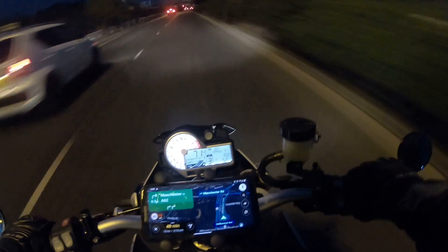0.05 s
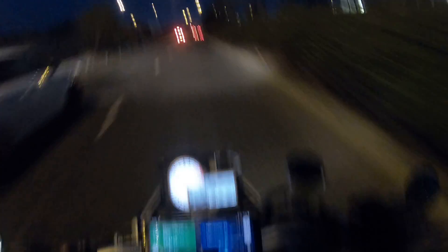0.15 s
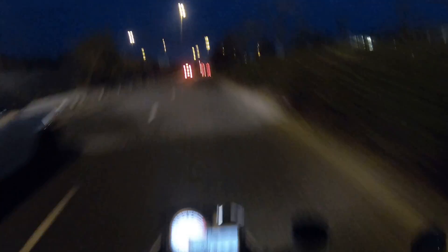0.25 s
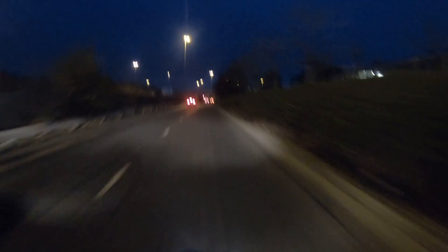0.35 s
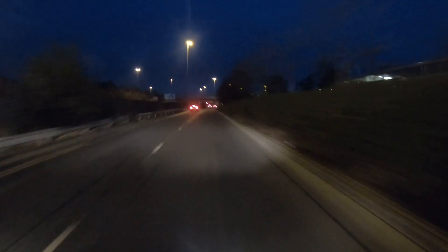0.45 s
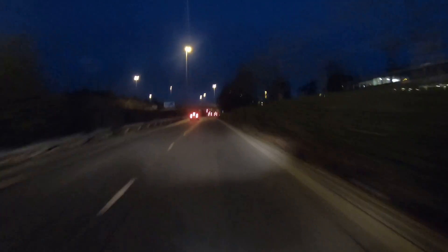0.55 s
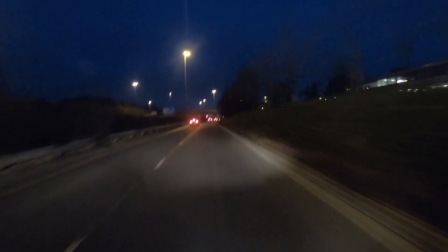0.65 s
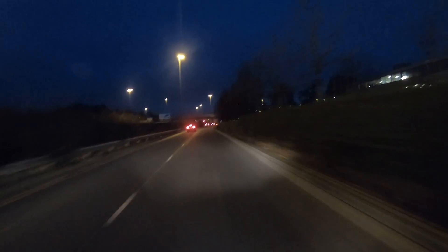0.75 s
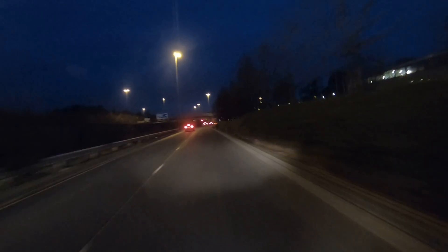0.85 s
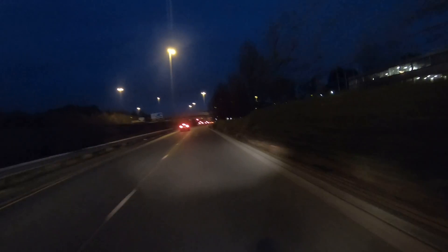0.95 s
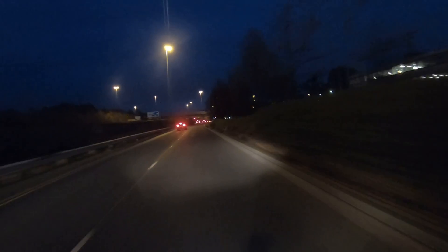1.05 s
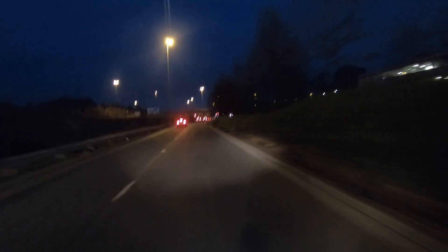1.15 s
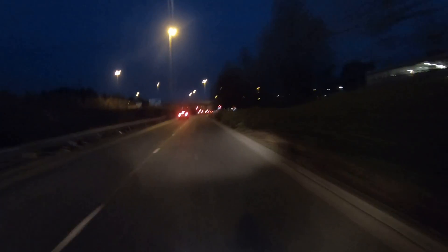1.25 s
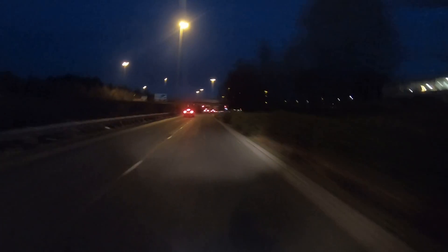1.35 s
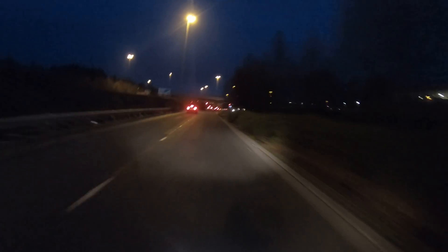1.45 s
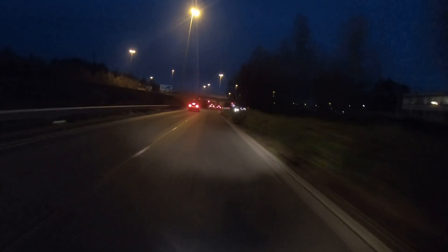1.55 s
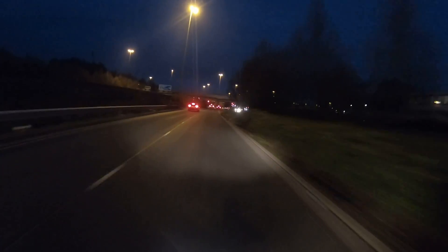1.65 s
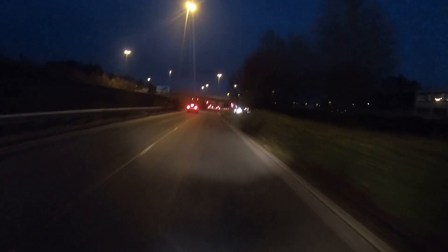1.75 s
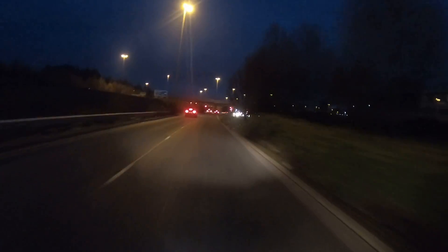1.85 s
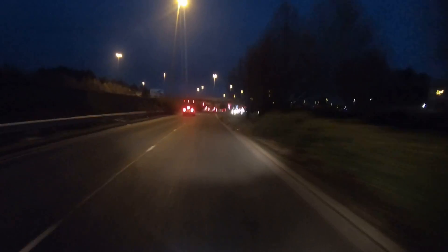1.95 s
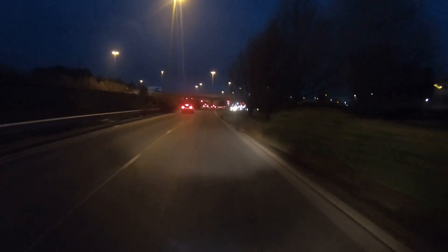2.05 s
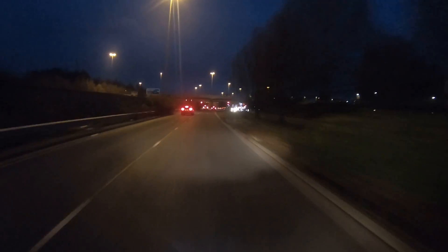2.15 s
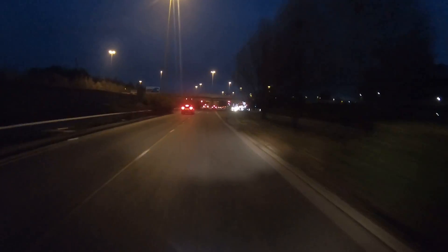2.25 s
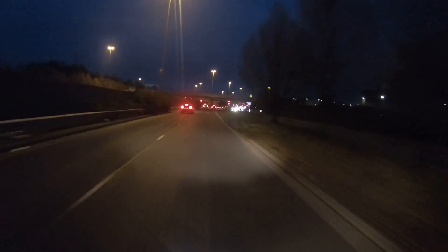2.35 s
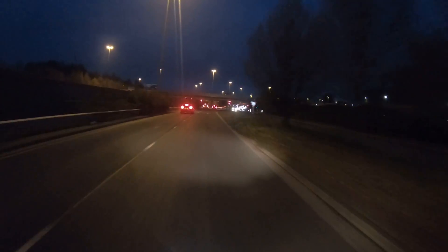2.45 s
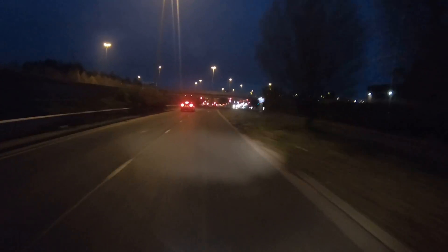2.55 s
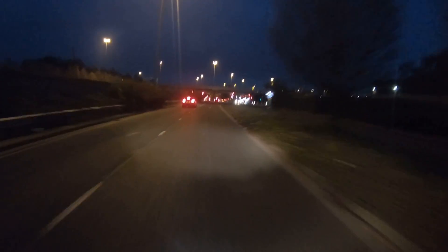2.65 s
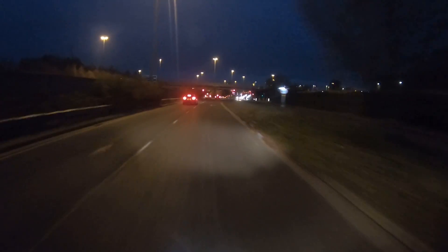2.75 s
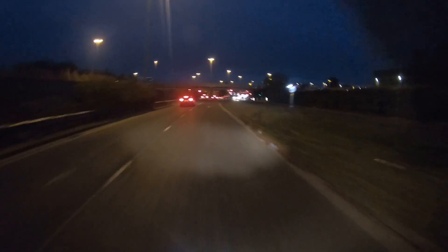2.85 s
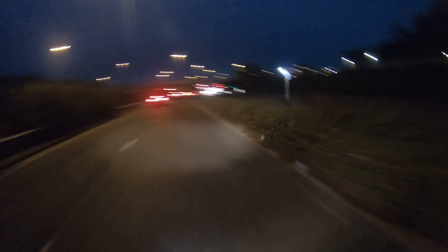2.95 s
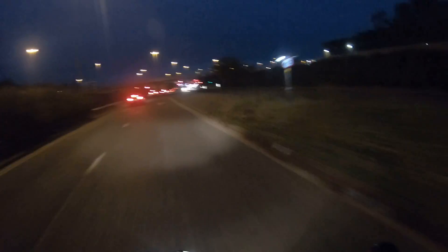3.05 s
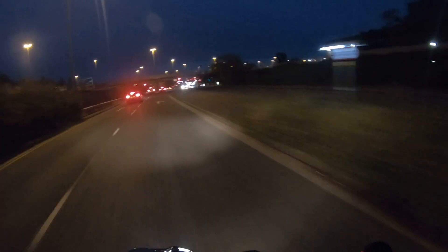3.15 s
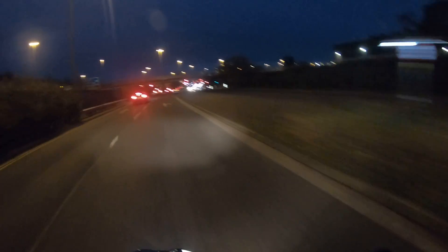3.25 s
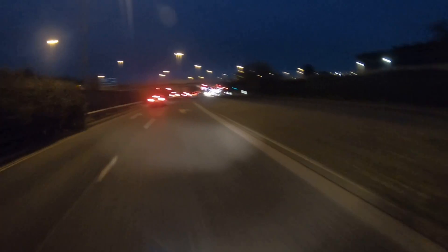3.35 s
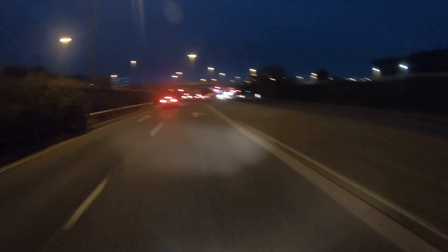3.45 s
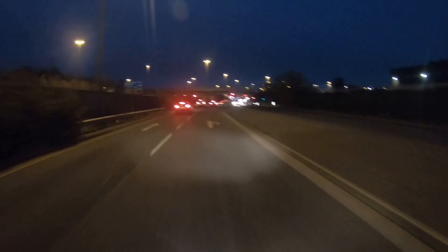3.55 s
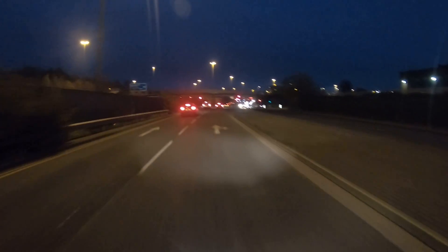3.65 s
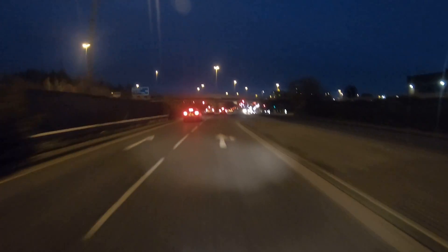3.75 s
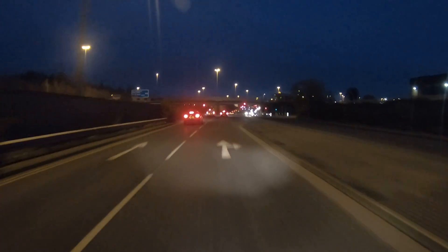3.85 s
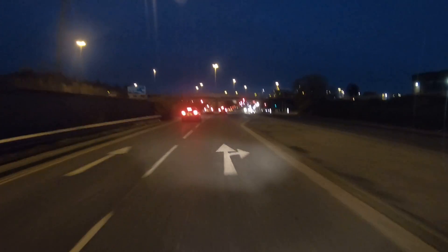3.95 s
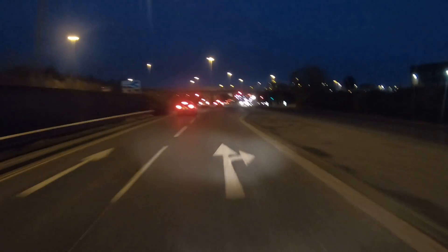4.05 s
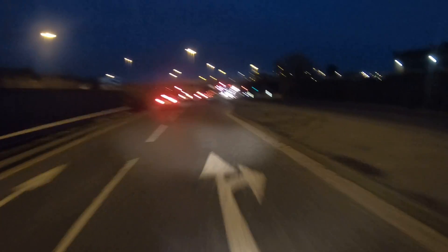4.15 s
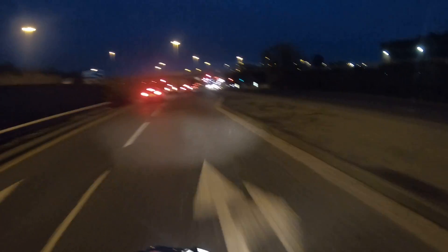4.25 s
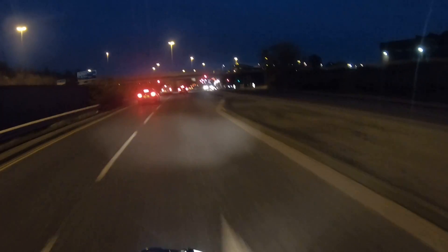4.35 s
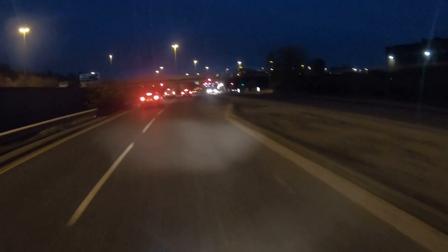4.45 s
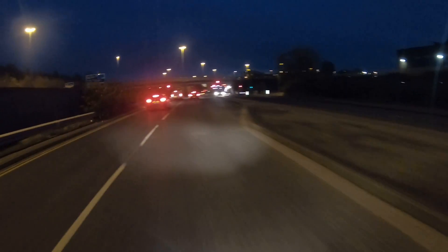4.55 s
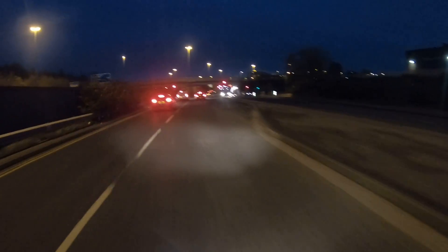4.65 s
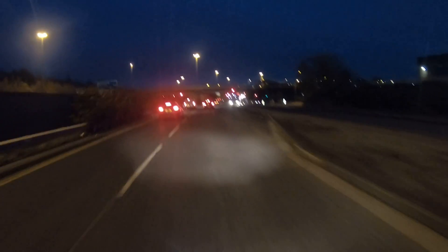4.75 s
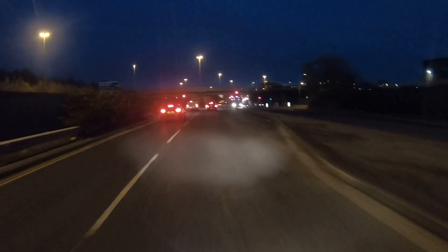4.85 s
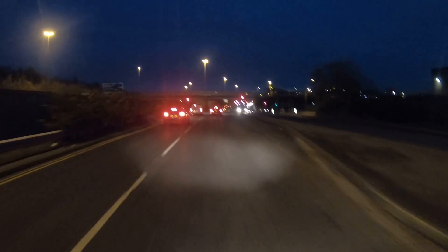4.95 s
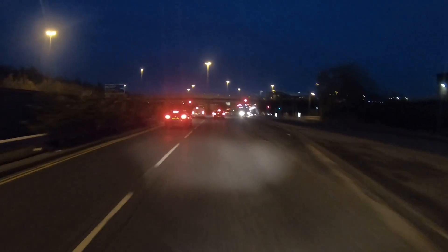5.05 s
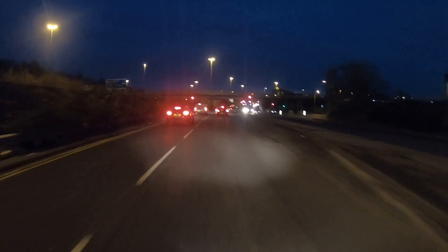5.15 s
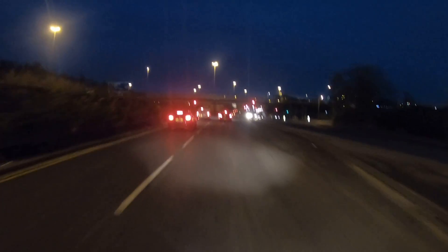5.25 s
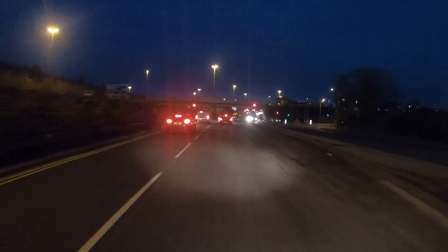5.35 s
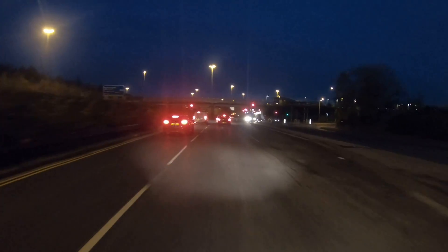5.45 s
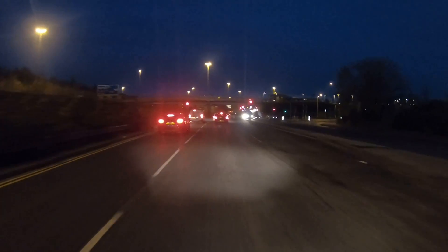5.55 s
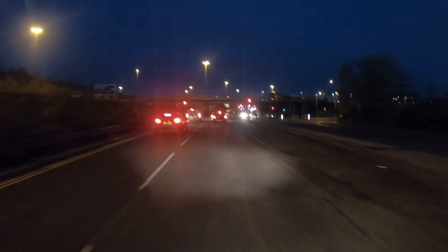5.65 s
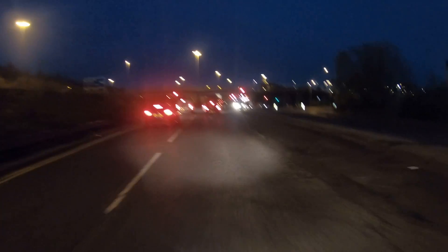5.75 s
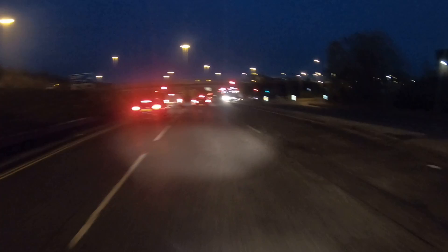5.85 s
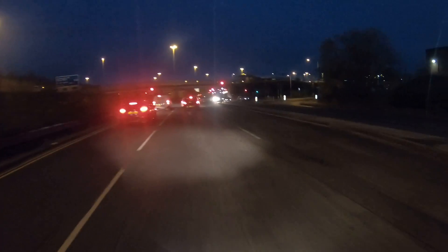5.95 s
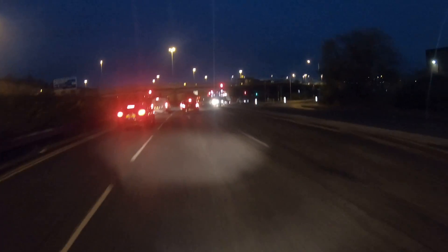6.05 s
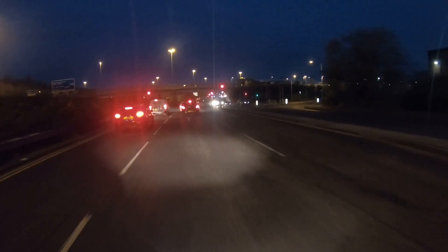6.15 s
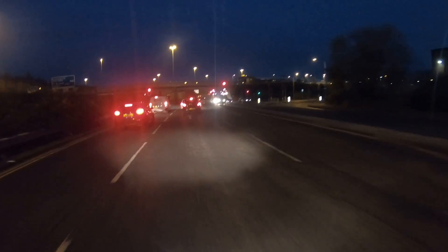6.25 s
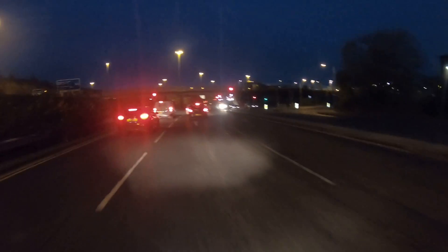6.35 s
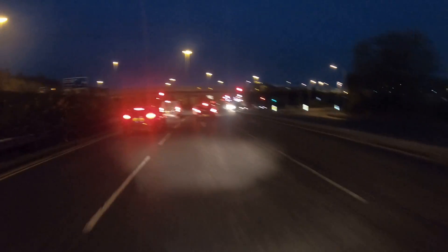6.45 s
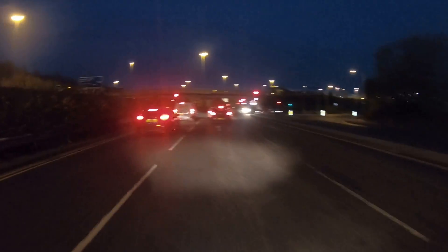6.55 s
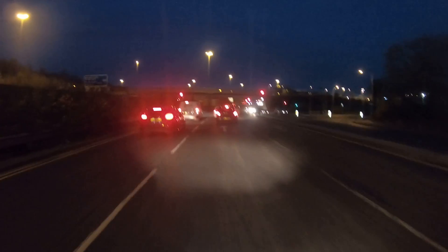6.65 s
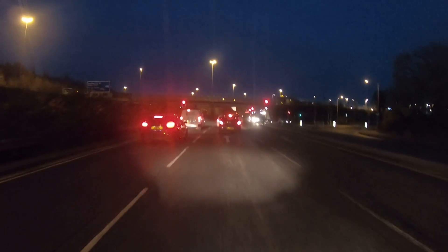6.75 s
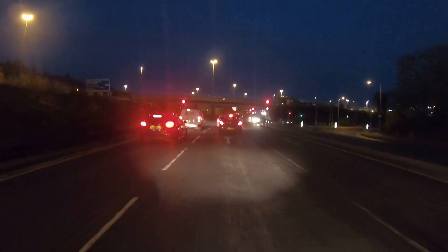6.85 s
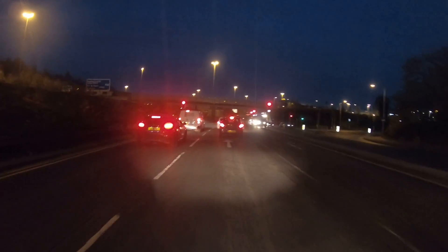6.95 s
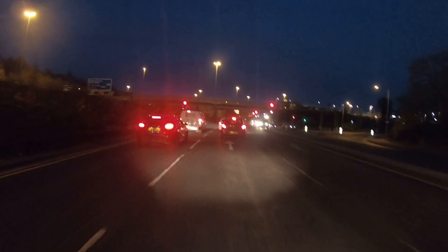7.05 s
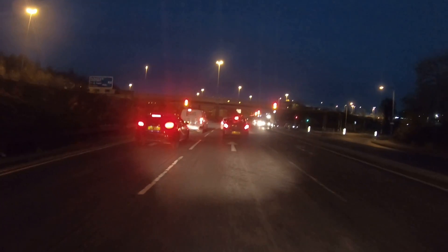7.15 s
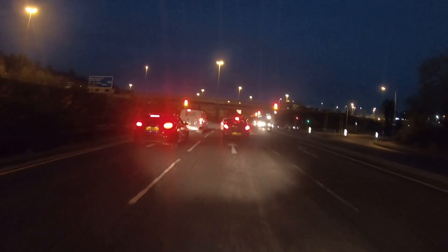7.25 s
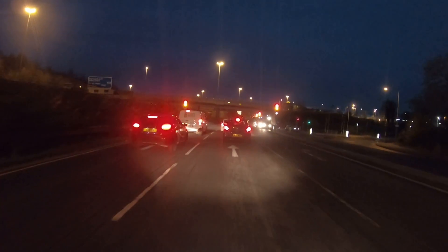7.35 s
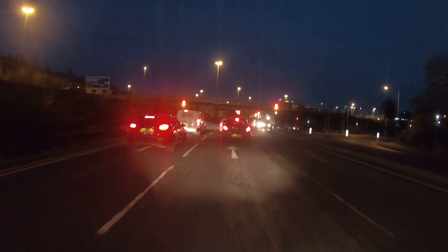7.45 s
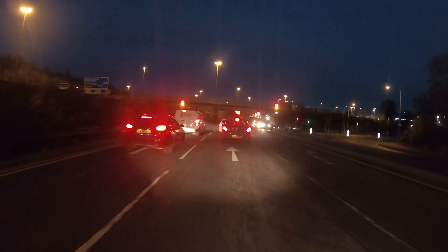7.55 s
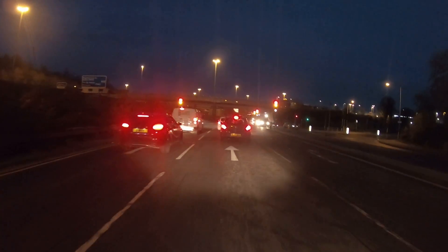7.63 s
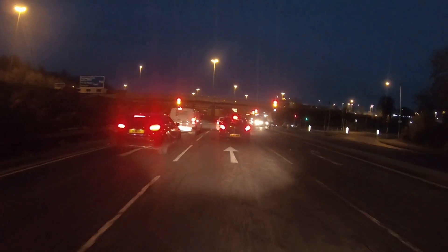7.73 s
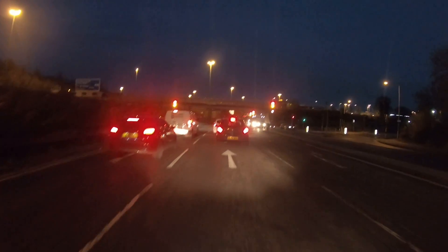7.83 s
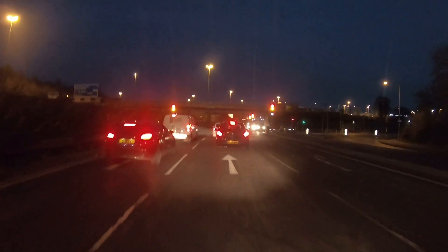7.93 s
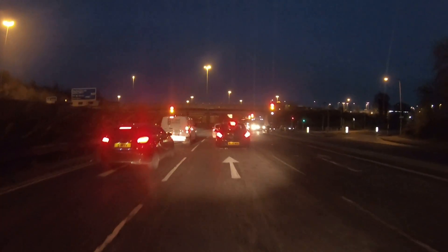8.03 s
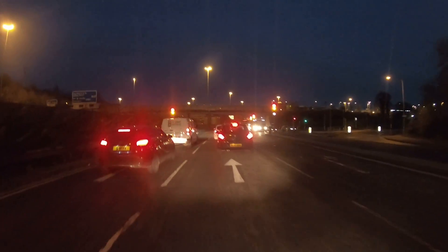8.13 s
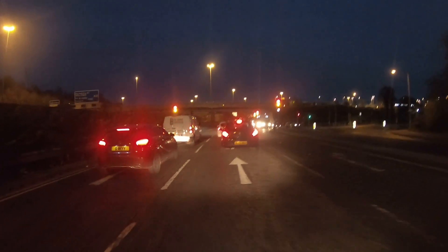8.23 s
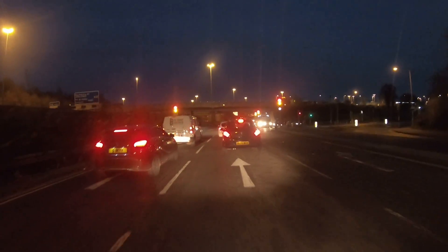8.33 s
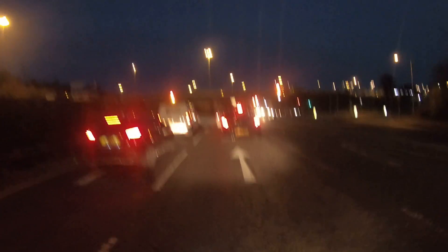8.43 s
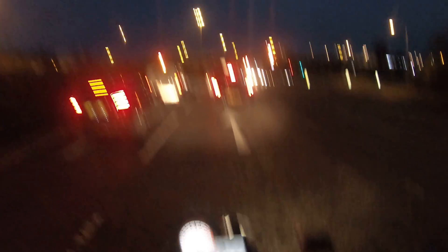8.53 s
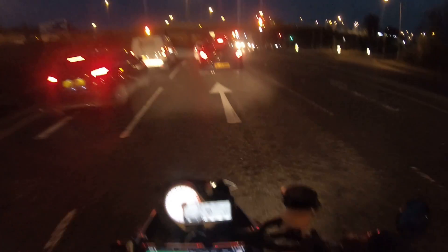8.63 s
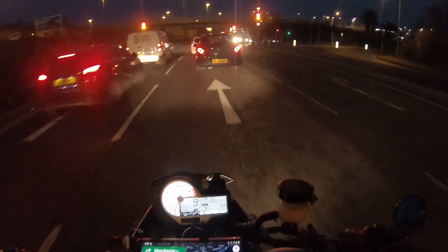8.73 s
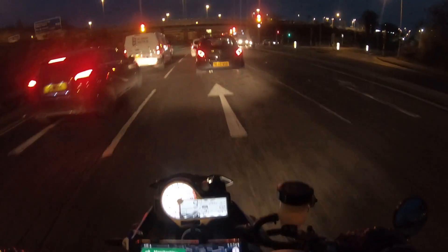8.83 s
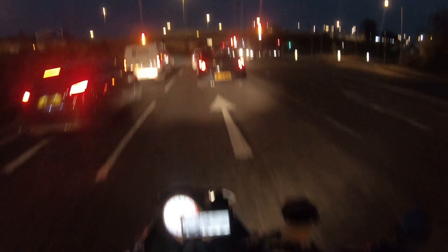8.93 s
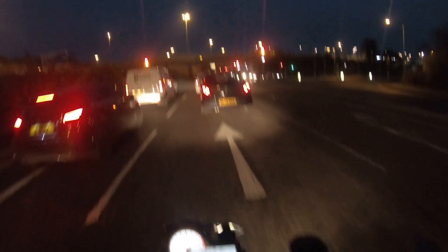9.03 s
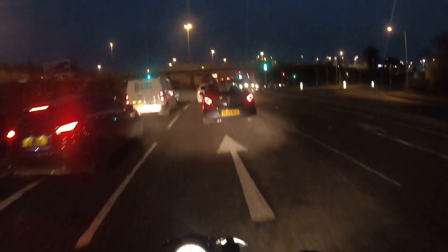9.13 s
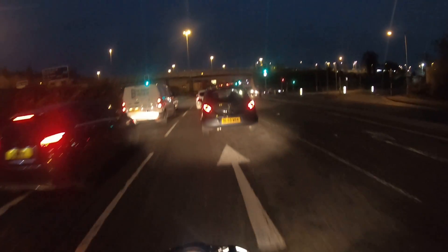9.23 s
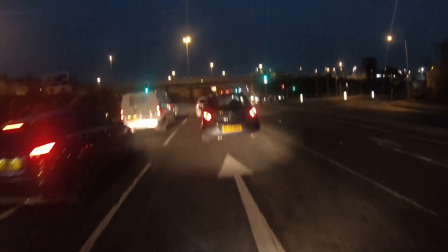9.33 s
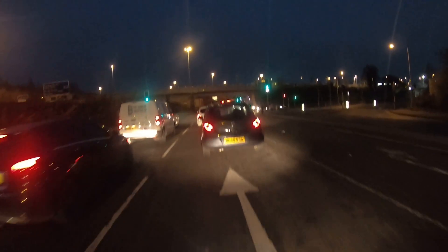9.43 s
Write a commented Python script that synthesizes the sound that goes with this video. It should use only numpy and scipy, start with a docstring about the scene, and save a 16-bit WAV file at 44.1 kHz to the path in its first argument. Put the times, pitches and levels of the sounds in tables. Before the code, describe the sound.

Heard from a motorcycle rider's helmet on an open road. At 0 s a deep, hard gust thumps over steady wind buffeting and a smooth, nearly pure exhaust drone of about 230 Hz, with bright valve clatter, hiss and gear whine. The throttle is shut, so everything glides gently downward. From about 2 s braking makes the fall quicker; a hollow intake burble passes around 2 to 3 s, and the discs sing faintly, a little more near 5.7 s. Wind eases, with a milder gust near 3.6 s. By 4 to 6 s the engine lugs, rough and throbbing, with quick dropouts from 5.6 to 6.1 s. At 6.2 s the clutch is pulled: the tone collapses and revs fall. Around 6.5 to 7.2 s a firmer, lumpy idle is caught, about 43 beats per second, hunting slightly with soft clatter until the end, around 9.5 s.

```python
"""A four-cylinder motorcycle coasts with the throttle shut, heard from the rider's helmet in buffeting wind.
Exhaust drone, valve clatter and gear whine, all timed by the firings, sink with the revs, faster once braking.
Brake discs sing faintly in their modes; the engine lugs, the exhaust note falters and the wind eases.
The clutch is pulled: the tone collapses, the revs drop, and the idle control catches a lumpy, hunting idle.
Tones follow the firing phase; exhaust beats are pulses in a pipe; rattle, air and pads are filtered noise."""
import sys
import numpy as np
from scipy import signal
from scipy.fft import rfft, irfft, next_fast_len
from scipy.io import wavfile
from scipy.ndimage import uniform_filter1d, map_coordinates

SR = 44100
rng = np.random.default_rng(int(sys.argv[2]) if len(sys.argv) > 2 else 0)


def materialize(psi):
    """Save the field psi as 16-bit PCM at rate SR to the path in sys.argv[1].

    A 1-D psi becomes a single channel; in a 2-D psi each row is a channel.
    """
    bounded = np.clip(np.atleast_2d(psi).T, -1, 1)
    quanta = np.round(bounded * 32767).astype(np.int16)
    wavfile.write(sys.argv[1], SR, quanta)


N = 418503


def amp(db):
    """Decibels to gain."""
    return 10 ** (np.asarray(db) / 20)


def unit(x):
    """Scale to rms 1."""
    return x / np.sqrt(np.mean(x ** 2) + 1e-20)


def clock():
    """Time of each sample in seconds."""
    return np.arange(N) / SR


def ramp(x, start, end):
    """0 at start, 1 at end, straight between and held beyond."""
    return np.clip((x - start) / (end - start), 0, 1)


def spell(s, length, order=4):
    """Flat-topped swell from 0 to 1 and back, centred on s; a higher order has steeper sides."""
    return np.exp(-np.abs(2 * (clock() - s) / length) ** order)


def wobble(rate):
    """Smooth random curve, rate knots a second."""
    knots = rng.standard_normal(int(N * rate / SR) + 4)
    return map_coordinates(knots, [np.arange(N) * rate / SR])


def filtered(x, response):
    """x times a complex response of frequency."""
    size = next_fast_len(N + SR // 2)
    return irfft(rfft(x, size) * response(np.fft.rfftfreq(size, 1 / SR)), size)[:N]


def coloured(x, points):
    """x through a (frequency [Hz], level [dB]) spectrum, at rms 1."""
    f, db = np.transpose(points)
    return unit(filtered(x, lambda hz: amp(np.interp(np.log(hz + 1), np.log(f), db))))


def resonate(x, modes):
    """x through (frequency [Hz], width [Hz], level [dB]) resonances, at rms 1."""
    def response(f):
        return sum(amp(db) * 1j * f * w / (c * c - f * f + 1j * f * w) for c, w, db in modes)
    return unit(filtered(x, response))


def band(centre_hz, width_hz):
    """Narrow noise of rms 1, passed twice through one resonance for steep sides."""
    mode = [(centre_hz, width_hz, 0)]
    return resonate(resonate(rng.standard_normal(N), mode), mode)


BRAKE_S, CLUTCH_S = 2.15, 6.2
START_HZ, IDLE_HZ = 229.2, 43.3  # firings per second
COAST_HZ_PER_S, BRAKE_HZ_PER_S, FREE_HZ_PER_S = 19.3, 30.1, 120  # fall of the firing rate in each stage


def geared_rate():
    """Firing rate the rear wheel imposes: falls gently while coasting, faster under the brakes."""
    t = clock()
    coasted = COAST_HZ_PER_S * np.minimum(t, BRAKE_S)
    return START_HZ - coasted - BRAKE_HZ_PER_S * np.maximum(t - BRAKE_S, 0)


# hunting idle: (time [s], firing rate [Hz])
IDLE_HUNT = [(6.8, 43.5), (7.27, 42.6), (7.59, 44.3), (7.71, 42.4), (7.84, 43.7), (7.99, 43.2),
             (8.18, 45.7), (8.45, 42.4), (8.62, 45.3), (8.78, 45.0), (8.96, 42.1), (9.18, 43.4),
             (9.37, 39.3), (9.49, 41.5)]


def engine_rate():
    """Firings per second: tied to the wheel until the clutch is pulled, then dropping to a hunting idle."""
    extra_fall = (FREE_HZ_PER_S - BRAKE_HZ_PER_S) * np.maximum(clock() - CLUTCH_S, 0)
    idle = np.interp(clock(), *np.transpose(IDLE_HUNT))
    return uniform_filter1d(np.maximum(geared_rate() - extra_fall, idle), SR // 20)


FEED_FROM_S, FEED_FULL_S = 6.42, 7.24


def idle_feed():
    """Opening of the idle control that catches the engine, 0-1."""
    return ramp(clock(), FEED_FROM_S, FEED_FULL_S)


DECLUTCH_S = 0.079


def declutched():
    """0 in gear, 1 once the engine runs free."""
    return ramp(clock(), CLUTCH_S, CLUTCH_S + DECLUTCH_S)


# faltering exhaust note: (time [s], length [s], depth [dB])
FALTERS = [(1.657, .05, 3.5), (1.798, 0.14, 3.5), (2.492, 0.24, 2), (3.047, 0.32, 1), (3.68, 0.16, 1.5),
           (5.648, 0.042, 10), (5.792, 0.034, 19), (5.87, 0.068, 10), (5.956, 0.048, 10),
           (6.044, 0.043, 20), (6.134, 0.05, 16), (6.604, .04, 7), (6.793, 0.045, 6), (7.71, 0.027, 12),
           (8.648, 0.026, 8)]


def stumble_db():
    """Level lost by the firing tone while the exhaust note falters."""
    return sum(db * spell(s, length) for s, length, db in FALTERS)


def road_speed(slowest_share=0.37):
    """Speed as a share of the first speed, down to a slow roll."""
    return np.maximum(geared_rate() / START_HZ, slowest_share)


LUG_FROM_HZ, LUG_FULL_HZ = 131, 64.5  # firing rates between which the drone lugs
# firing tone at speed, its loss as the revs sink, when lugging, and as the load comes off
DRONE_DB, SLOWING_LOSS_DB, LUG_LOSS_DB, DECLUTCH_LOSS_DB = -12, 1.5, 9, 23.5
CRANK_HZ, CRANK_WIDTH_HZ, CRANK_DB = 68, 22, -36.5  # frame resonance, shaken once a crank turn
# drone overtones: (multiple of firing rate, level against firing tone before the muffler [dB])
DRONE_OVERTONES = [(3, -26), (4, -31), (5, -37)]
# muffler's gain on the overtones: (frequency [Hz], gain [dB])
MUFFLER_GAIN = [(200, -5), (300, -3), (400, -4.5), (500, -9.5), (660, -9), (850, -21.5), (1200, -27)]
# pipe resonances the octave sweeps through: (frequency [Hz], width [Hz], level [dB])
OCTAVE_MODES = [(166, 50, -32), (212, 31, -41), (305, 34, -31), (362.7, 57.4, -24), (428, 23, -38.5)]


def drone(firings, rate, octave_declutch_db=13, octave_rough_db=0.9, lug_rough_db=5.5, lug_jitter_rad=.12):
    """Exhaust pulses merge at speed into an almost pure tone that fades and roughens as the engine lugs."""
    lugging = ramp(rate, LUG_FROM_HZ, LUG_FULL_HZ) ** 1.9
    tone_db = DRONE_DB - SLOWING_LOSS_DB * (1 - rate / START_HZ) - LUG_LOSS_DB * lugging
    tone_db = tone_db - DECLUTCH_LOSS_DB * declutched() - stumble_db()
    turn = 2 * np.pi * firings + (0.019 + lug_jitter_rad * lugging ** 2) * wobble(40)

    tone = np.cos(turn)
    for k, db in DRONE_OVERTONES:
        passed_db = np.interp(k * rate, *np.transpose(MUFFLER_GAIN))
        gain = amp(db + passed_db + 2.4 * wobble(15))
        tone = tone + gain * np.cos(round(k) * turn + 0.25 * wobble(30))

    resonance = sum(amp(db) / (1 + (2 * (2 * rate - hz) / width) ** 2) ** 1.58
                    for hz, width, db in OCTAVE_MODES)
    flutter_db = (octave_rough_db + lug_rough_db * lugging ** 2) * wobble(25)
    octave_gain = resonance * amp(flutter_db - octave_declutch_db * declutched())
    octave = octave_gain * np.cos(2 * turn + 1.1 * lugging ** 2 * wobble(35))

    # two firings per crank turn
    shake = amp(CRANK_DB + 6 * wobble(11)) / (1 + (2 * (rate / 2 - CRANK_HZ) / CRANK_WIDTH_HZ) ** 2)
    crank = shake * np.cos(np.pi * firings + .6 * wobble(20))
    return np.sqrt(2) * (amp(tone_db + 0.28 * wobble(30)) * tone + octave + crank)


def combustion(rate, fast_db=-38, lug_db=-26, starved_db=-29, idle_db=-19, lug_from_hz=112, lug_full_hz=80):
    """Level (dB) and unevenness (0-1) of beats: faint at speed, ragged lugging, weak freed, firm once fed."""
    lugging, free, feed = ramp(rate, lug_from_hz, lug_full_hz), declutched(), idle_feed()
    level_db = fast_db + (lug_db - fast_db) * lugging
    level_db = level_db + (starved_db - lug_db) * free + (idle_db - starved_db) * feed
    uneven = (0.35 + 0.25 * lugging - 0.22 * free) * (1 - feed) + .12 * feed
    return level_db, uneven


# mean strength of each cylinder in firing order: (strength [ratio])
CYLINDER_STRENGTHS = [1.13, 0.93, 1.1, 0.85]
# exhaust pipe spectrum: (frequency [Hz], relative level per Hz [dB])
PIPE_SPECTRUM = [(15, -28.5), (30, -16), (44, -14), (62, -1), (88, -6), (108, 2.5), (130, 4), (150, 0.5),
                 (175, -12), (225, -22), (268, -11.5), (315, -16.5), (365, -24), (440, -25.5), (530, -35),
                 (900, -66), (2000, -110)]


def beats(firings, rate, misfire_share=0.061, misfire_db=-8, scatter_s=0.0033, turbulence_db=-10.5,
          stumble_share=0.26, starved_dull_db=-5):
    """Each firing puffs into the pipe with its own strength and timing; now and then one burns weakly."""
    level_db, uneven = combustion(rate)
    at = np.flatnonzero(np.diff(np.floor(firings)))
    strength, timing, burn = rng.uniform(-1, 1, (len(at), 3)).T
    size = np.resize(CYLINDER_STRENGTHS, len(at)) * (1 + 1.3 * uneven[at] * strength)
    size *= np.where(np.abs(burn) < misfire_share, amp(misfire_db), 1)
    late = np.round(scatter_s * SR * uneven[at] * timing).astype(int)
    puffs = np.bincount(np.clip(at + late, 0, N - 1), size / np.sqrt(rate[at]), N)

    # turbulent rush of gas, rougher when the burn is uneven
    rush = rng.standard_normal(N) * (1 + .5 * np.cos(2 * np.pi * firings)) * (0.91 + 2 * uneven)
    pipe = coloured(unit(puffs - puffs.mean()) + amp(turbulence_db) * rush, PIPE_SPECTRUM)

    def chambers(hz):
        """Silencer chambers delay the upper notes by up to 16 ms, which rounds each thump."""
        delay_s = np.interp(hz, [170, 420], [0, .016])
        return np.exp(-2j * np.pi * np.cumsum(delay_s) * hz[1])

    pipe = filtered(pipe, chambers)
    # a starved burn has less edge
    edge = filtered(pipe, lambda hz: 1 - 1 / (1 + (hz / 230) ** 6))
    pipe = pipe + edge * (amp(starved_dull_db * (1 - idle_feed())) - 1)
    return amp(level_db - np.maximum(stumble_share, declutched()) * stumble_db()) * pipe


def chatter(firings, repeat_share, throb):
    """Valves and chain: part of the rattle repeats every four firings, the rest is new; all throbs with them."""
    cycle = signal.resample(rng.standard_normal(256), 8192)
    repeating = unit(np.interp(firings / 4 % 1, np.linspace(0, 1, len(cycle)), cycle))
    share = np.clip(repeat_share, 0, 1)
    rattle = np.sqrt(share) * repeating + np.sqrt(1 - share) * rng.standard_normal(N)
    return rattle * (1 + throb * np.cos(2 * np.pi * firings))


def rattle_levels(rate, clatter_db=-45.5, clatter_revved_db=12.0, clatter_free_db=2.5, clatter_fed_db=5,
                  clatter_top_db=-1.1, hiss_db=-56, hiss_revved_db=9, hiss_fed_db=1.8, hiss_top_db=-1.0,
                  full_hz=174, settle_per_s=0.24):
    """Clatter and hiss (dB) climb with revs, ease at the very top, return as the idle catches, then settle."""
    feed = idle_feed() * (1 - settle_per_s * np.maximum(clock() - FEED_FULL_S, 0))
    free, top = ramp(clock(), CLUTCH_S, CLUTCH_S + 0.14), ramp(rate, 200, 218)
    clatter = clatter_db + clatter_revved_db * ramp(rate, 90, full_hz) ** 2 + clatter_top_db * top
    hiss = hiss_db + hiss_revved_db * ramp(rate, IDLE_HZ, full_hz) ** 1.7 + hiss_top_db * top
    return clatter + clatter_free_db * free + clatter_fed_db * feed, hiss + hiss_fed_db * feed


# clatter spectrum at high revs: (frequency [Hz], relative level per Hz [dB])
FAST_CLATTER = [(250, -38), (520, -4.5), (760, -9), (930, -7), (1100, -4), (1250, -1.5), (1400, 3),
                (1600, -9.5), (1850, -4), (2180, -9), (2350, -9.5), (2600, -15.5), (2900, -19.3),
                (4200, -61.5)]
# clatter spectrum at idle: (frequency [Hz], relative level per Hz [dB])
IDLE_CLATTER = [(250, -35), (520, -3), (720, -3.5), (900, -2.5), (1060, -1), (1200, -4), (1420, -2),
                (1560, -8), (1800, -5.5), (2070, -6), (2300, -15.5), (2600, -11), (2900, -20.5),
                (4200, -57)]
# engine case modes: (frequency [Hz], width [Hz], relative level [dB])
CASE_MODES = [(1079, 29, -4.5), (1402, 50, -2), (2064, 43, -8), (2184, 25, -3.5), (2390, 71, -13.5)]
# chain whirr: (multiple of firing rate, relative level [dB])
WHIRR_ORDERS = [(7, -16), (8, -16), (9, -4)]


def clatter(firings, revved, level_db):
    """Valve gear rattles the case, brighter at high revs; chain orders whirr loudest as they pass about 1.5 kHz."""
    rattle = chatter(firings, repeat_share=.02 + .13 * revved, throb=0.11)
    broad = np.sqrt(revved) * coloured(rattle, FAST_CLATTER)
    broad = broad + np.sqrt(1 - revved) * coloured(rattle, IDLE_CLATTER)
    ring = resonate(chatter(firings, repeat_share=0.077, throb=0.54), CASE_MODES)
    ring = filtered(ring, lambda hz: 1 / (1 + (hz / 3000) ** 6))
    rate = np.gradient(firings) * SR
    whirr = 0
    for k, db in WHIRR_ORDERS:
        swell = 1 / (1 + np.abs((k * rate - 1540) / 95) ** 4)
        phase = 2 * np.pi * round(k) * firings + 0.96 * wobble(110)
        whirr = whirr + amp(db - 2.5) * swell * np.sin(phase)
    return amp(level_db + 0.72 * wobble(15)) * (amp(-0.79) * broad + amp(-6.5) * ring + whirr)


# mechanical hiss spectrum: (frequency [Hz], relative level per Hz [dB])
HISS_SPECTRUM = [(1800, -25), (2900, -3), (3300, -3), (3800, -0.2), (4500, -4), (5300, -5.5), (6200, -3),
                 (6600, -8.5), (7100, -15), (8400, -16), (9300, -25.5), (10500, -34.5), (14000, -58.5)]
# gear whine: (multiple of firing rate, level before cover and revs [dB])
GEAR_ORDERS = [(13, -6), (19, -13.5), (25, -13), (26, -8.5), (39, -12.5)]


def gears(firings, revved, level_db):
    """Top-end hiss with gear whine, which the gear cover radiates best in a broad band."""
    hiss = amp(-0.3) * coloured(chatter(firings, repeat_share=0.019, throb=0.12), HISS_SPECTRUM)
    rate = np.gradient(firings) * SR
    whine = 0
    for k, db in GEAR_ORDERS:
        near_cover = 1 / (1 + ((k * rate - 4100) / 1200) ** 2)
        phase = 2 * np.pi * round(k) * firings + 0.77 * wobble(50)
        whine = whine + amp(db + 3.3 * wobble(8)) * near_cover * np.sin(phase)
    return amp(level_db + 0.57 * wobble(15)) * (hiss + np.sqrt(revved) * whine)


def machinery(firings, rate):
    """Valve gear, chain and gears, their level and colour set by the revs."""
    clatter_db, hiss_db = rattle_levels(rate)
    revved = np.clip((rate - 60) / 110, 0, 1)
    return clatter(firings, revved, clatter_db) + gears(firings, revved, hiss_db)


def airbox(firings, rate, rest_db=-49.0, revved_db=3.0, fed_db=7, flare_db=-31.0, flare_rate_hz=177.0,
           flare_width_hz=20):
    """Hollow rush pulsing with the intake strokes; flares into a burble as the revs sink through one range."""
    rush_db = rest_db + revved_db * ramp(rate, 110, 190) + fed_db * idle_feed()
    rush = amp(rush_db + 0.75 * wobble(28)) * band(centre_hz=381, width_hz=140)
    flare = 1 / (1 + (2 * (rate - flare_rate_hz) / flare_width_hz) ** 20)
    burble = flare * amp(flare_db + 2 * wobble(30)) * band(centre_hz=389, width_hz=85)
    return (rush + burble) * (1 + 0.15 * np.cos(2 * np.pi * firings))


BRAKE_DB, BRAKE_RISE_S, BRAKE_OFF_S = -56.5, 1.5, 7  # disc level, time to press or let go, start of release
SQUEEZE_S, SQUEEZE_LENGTH_S, SQUEEZE_DB = 5.73, 1.3, 4.5  # one harder squeeze
PAD_HISS_DB = -65  # at full lever and first speed
# brake disc modes: (frequency [Hz], width before widening [Hz], relative level per root Hz [dB])
DISC_MODES = [(2140, 12, 3.5), (2480, 69, -1), (2640, 36, -6), (3410, 110, -12)]


def brakes(released_db=11):
    """Pads hiss with the road speed; discs sing faintly in their modes, more during the harder squeeze."""
    t = clock()
    lever = ramp(t, BRAKE_S - BRAKE_RISE_S, BRAKE_S) - ramp(t, BRAKE_OFF_S, BRAKE_OFF_S + BRAKE_RISE_S)
    level_db = BRAKE_DB - released_db * (1 - lever) + SQUEEZE_DB * spell(SQUEEZE_S, SQUEEZE_LENGTH_S)
    disc = sum(amp(db + 2.7 * wobble(6)) * np.sqrt(width) * band(hz, 1.4 * width)
               for hz, width, db in DISC_MODES)
    pads = amp(PAD_HISS_DB) * lever * road_speed() ** 1.8 * band(centre_hz=8240, width_hz=1400)
    return amp(level_db) * unit(disc) + pads


WIND_DB, WIND_DB_PER_DECADE = -25, 30  # buffet at the first speed without gusts, growth with speed
# gusts on the helmet: (time [s], length [s], buffet rise [dB], thump level [dB])
HELMET_GUSTS = [(.17, .45, 2, -16.5), (.61, .06, 5.5, -36), (1.8, .3, 3.5, -39), (3.65, 0.72, 4, -38),
                (5.297, 1.5, -1.5, -35.5)]
# buffet spectrum: (frequency [Hz], relative level per Hz [dB])
BUFFET_SPECTRUM = [(15, -13.5), (30, -3), (60, -3.5), (120, -3), (220, -2), (330, -11), (500, -18),
                   (800, -30), (1600, -67.5), (5000, -100)]


def wind():
    """Air buffets the helmet less as the bike slows, with deep gusts, the hardest at the start."""
    buffet_db = WIND_DB + WIND_DB_PER_DECADE * np.log10(road_speed())
    buffet_db = buffet_db + sum(rise * spell(s, length) for s, length, rise, _ in HELMET_GUSTS)
    thump = sum(amp(db) * spell(s, length, order=10) for s, length, _, db in HELMET_GUSTS)
    buffet = amp(buffet_db + 1.5 * wobble(12)) * coloured(rng.standard_normal(N), BUFFET_SPECTRUM)
    return buffet + thump * band(centre_hz=34.4, width_hz=52)


# spells of high sizzle: (time [s], length [s], level [dB])
SIZZLE_SPELLS = [(3.65, .6, -76), (4.952, .7, -73), (7.6, 2.4, -73.5), (9.107, 1.1, -75.5)]


def sizzle():
    """Very faint, high noise that flickers in spells."""
    level = sum(amp(db) * spell(s, length) for s, length, db in SIZZLE_SPELLS)
    # (frequency [Hz], relative level per Hz [dB])
    colour = [(10800, -48.5), (11900, -3.0), (12600, 0.0), (14200, -9), (15700, -17.5)]
    return level * unit(coloured(rng.standard_normal(N), colour) * amp(2 * wobble(70)))


def scene():
    """The crankshaft times every engine sound; brakes, wind and sizzle are added."""
    rate = engine_rate()
    firings = .25 + np.cumsum(rate) / SR  # running count, the phase of every engine sound
    engine = drone(firings, rate) + beats(firings, rate) + machinery(firings, rate) + airbox(firings, rate)
    return (engine + brakes() + wind() + sizzle())[None]


TOP_HZ = 15700


def record(dry):
    """Remove everything from the band limit up."""
    return np.array([filtered(channel, lambda hz: hz < TOP_HZ) for channel in dry])


dry = scene()
out = record(dry)
materialize(out)
```